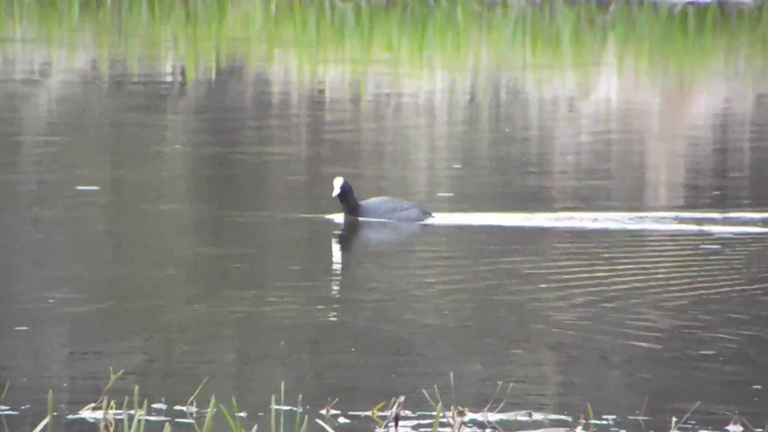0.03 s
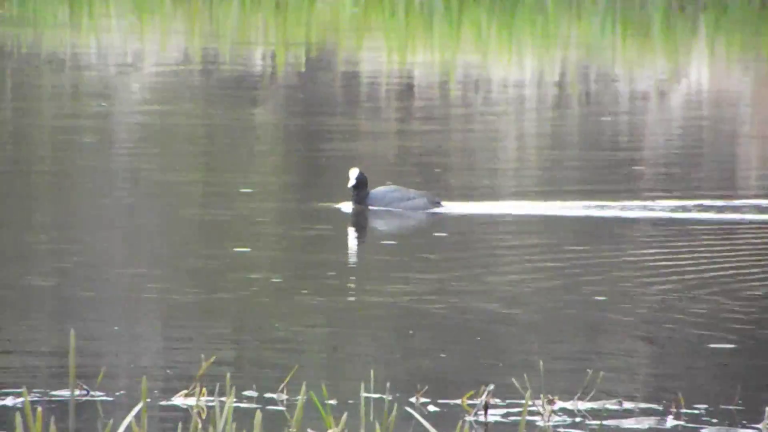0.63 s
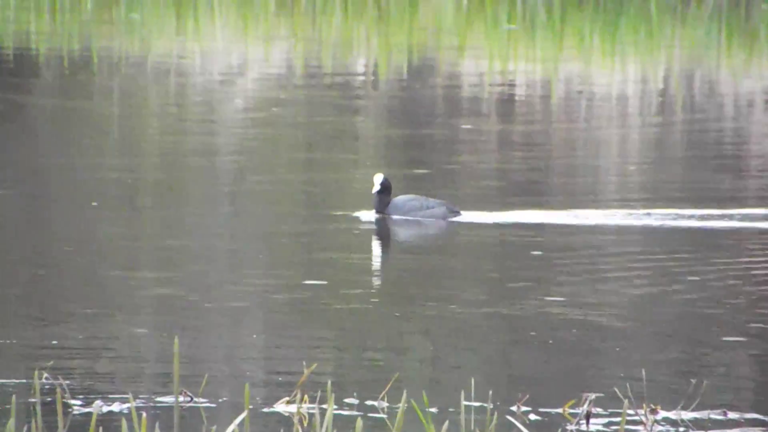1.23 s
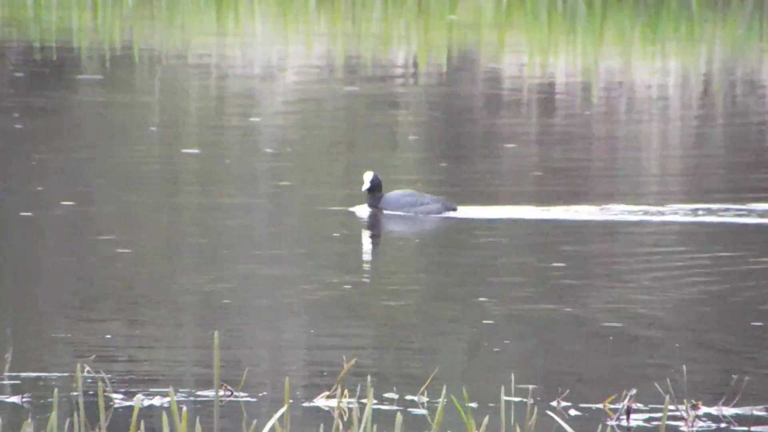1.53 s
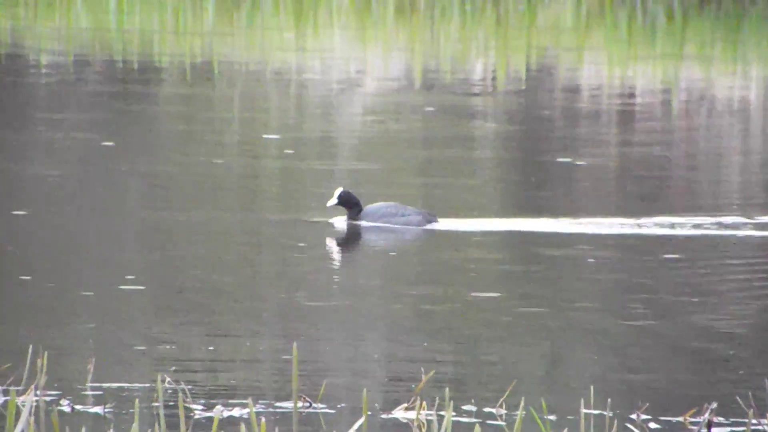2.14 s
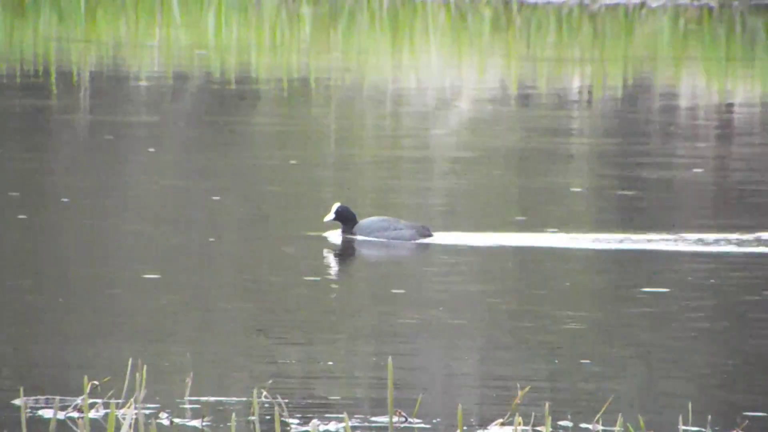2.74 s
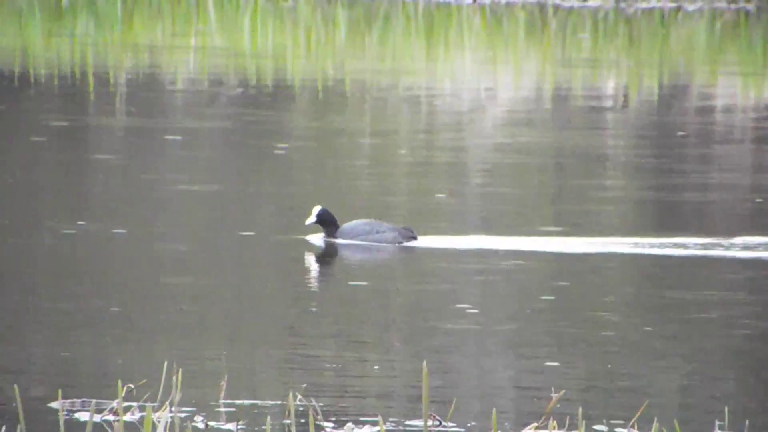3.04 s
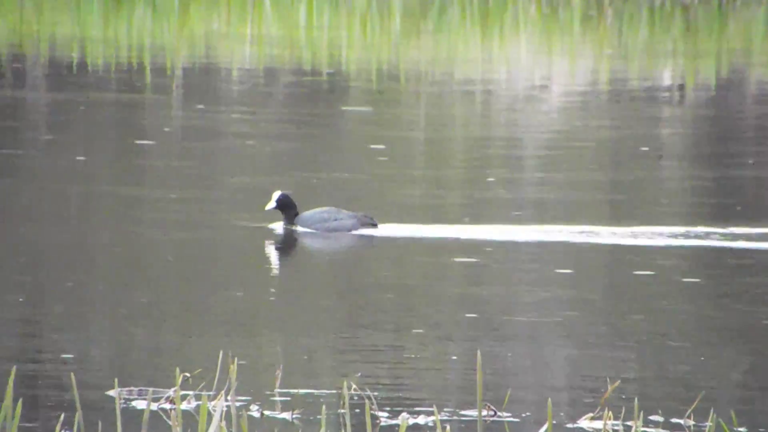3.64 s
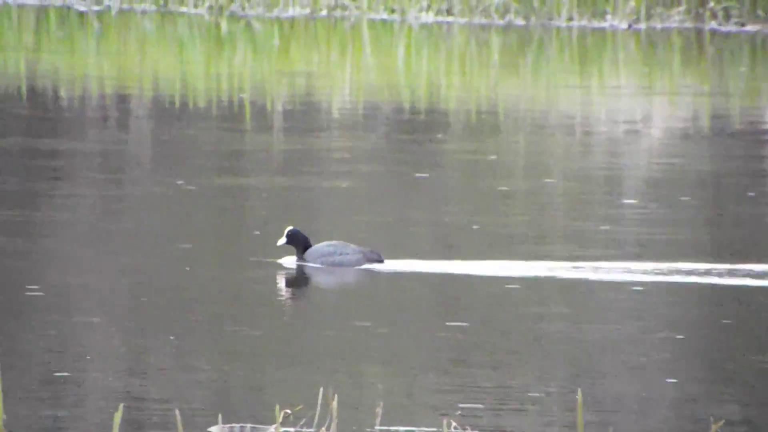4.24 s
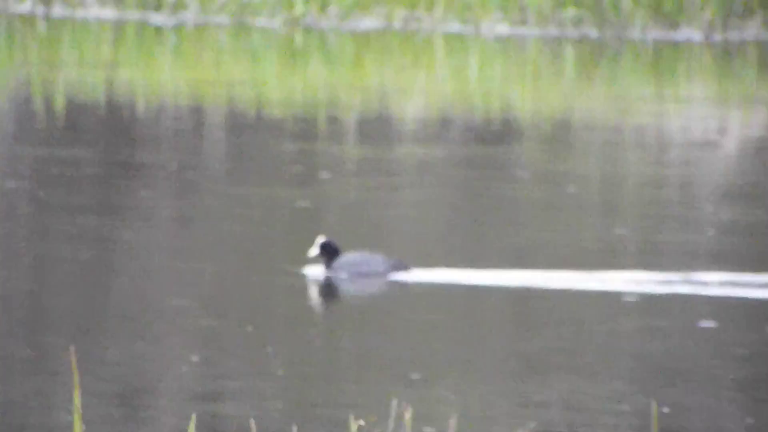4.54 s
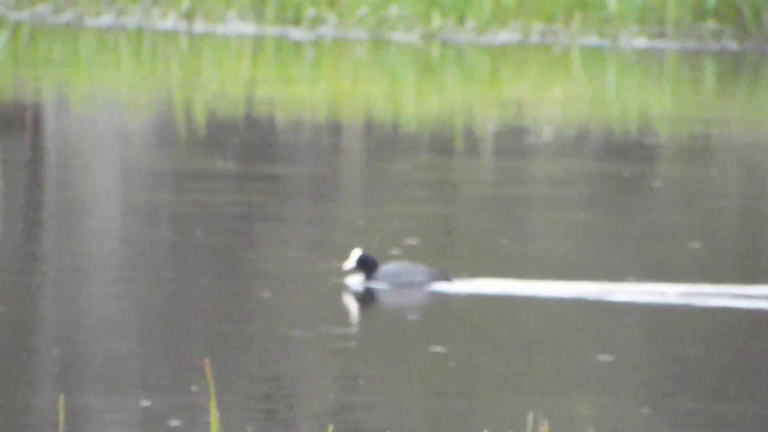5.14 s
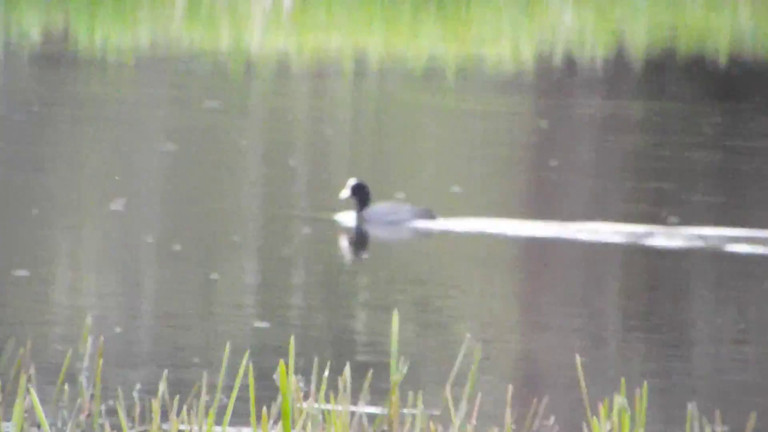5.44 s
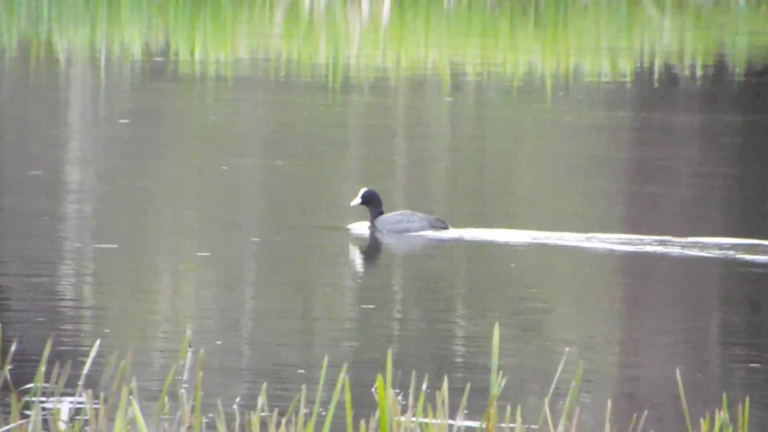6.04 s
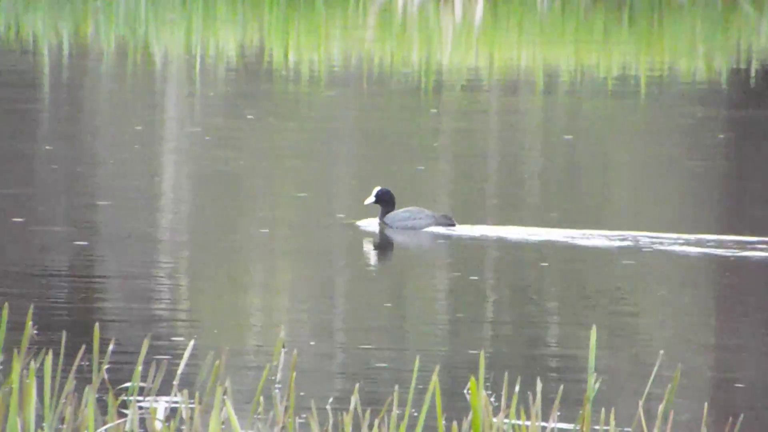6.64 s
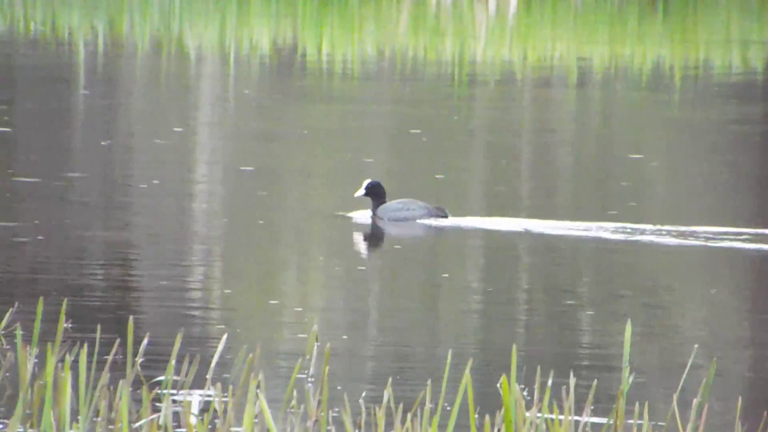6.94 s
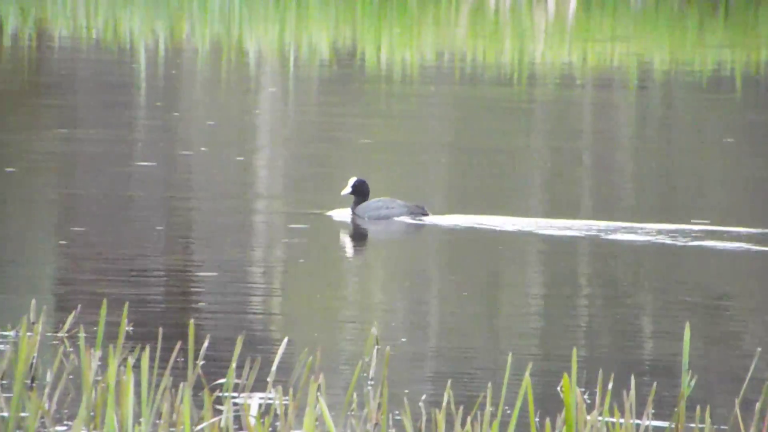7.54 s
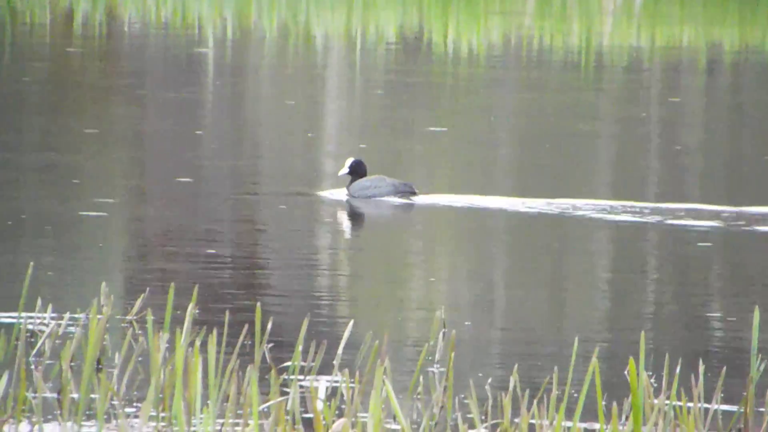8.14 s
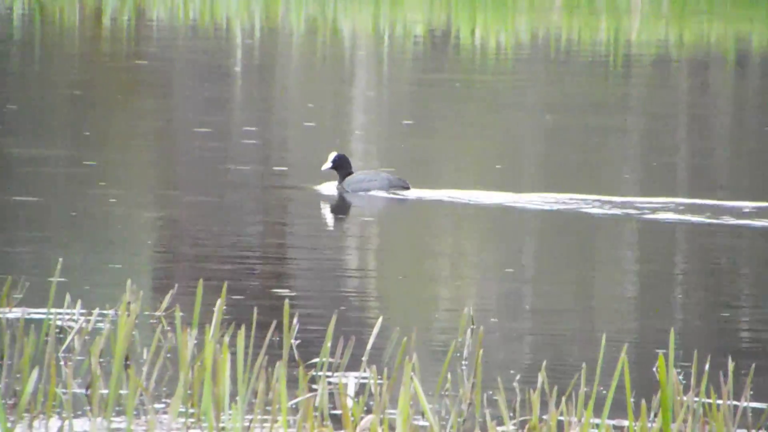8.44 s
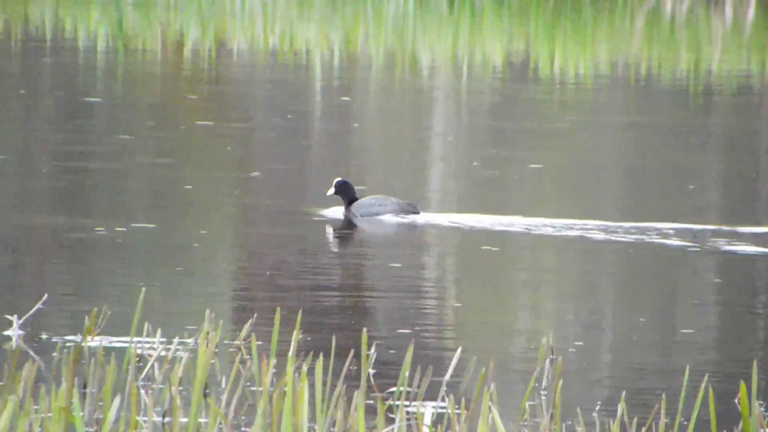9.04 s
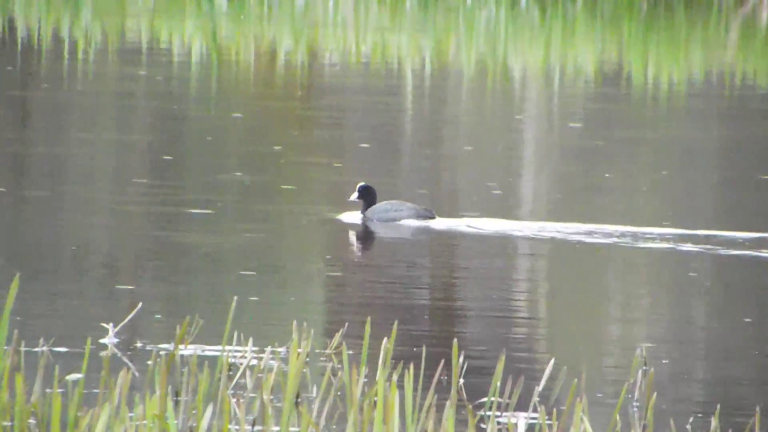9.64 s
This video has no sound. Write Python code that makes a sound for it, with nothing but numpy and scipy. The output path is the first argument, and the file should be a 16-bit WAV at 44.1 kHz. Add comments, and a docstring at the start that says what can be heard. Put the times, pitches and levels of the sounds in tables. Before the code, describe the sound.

A coot gives a steady series of short, sharp barking calls on a lake, with faint songbirds and light wind on the microphone.

```python
"""A lake. A brief thin buzz opens; air hiss, a camera's whir and light wind buffeting its two microphone
ports come in. From 0.26 to 4.7 s a coot calls nine times: a pulsed bark ending in two falling voices, one
per side of the syrinx. The reeds swell at 0.3 s; from 0.4 s small birds chirp far off in them. From 0.5 s
the focus motor rasps in short runs. The coot gives single-pulse 'pit' notes at 1.4 and 5.2 s. The camera
body clicks twice near 8 s; a last 'pit' follows at 9.3 s."""
import sys
import numpy as np
from scipy import signal
from scipy.fft import rfft, irfft
from scipy.io import wavfile
from scipy.ndimage import uniform_filter1d

SR = 44100
rng = np.random.default_rng(int(sys.argv[2]) if len(sys.argv) > 2 else 0)


def put_to_file(sound):
    """Save the sound as 16-bit audio at rate SR, in the file named by the first command-line argument."""
    columns = np.atleast_2d(sound).T  # one column per channel
    safe = np.clip(columns, -1, 1)
    whole_steps = np.round(safe * 32767)
    wavfile.write(sys.argv[1], SR, whole_steps.astype(np.int16))


N = 432180
TIME_S = np.arange(N) / SR
LEFT_RIGHT = np.array([[1], [-1]])
PUFF_HALF_SPAN_S = .03

# opening buzz spectrum: freq_hz, gain_db
BUZZ_SPECTRUM = [(100, -21), (280, -6), (700, -.5), (2500, -11), (14000, -27)]
# air and microphone hiss: freq_hz, gain_db
AIR_SPECTRUM = [(20, -21), (45, -8), (90, -14), (200, -26), (450, -13), (700, -8.5), (1200, -5.5),
                (1700, -12), (2500, -13.5), (5000, -19), (9000, -21.5), (15500, -22)]
# reed hiss envelope: time_s, level_db
REED_LEVELS = [(0, -72), (.3, -59.5), (.6, -58), (.9, -68), (1.3, -72.5), (3, -72), (9.8, -72.5)]
# reed hiss: freq_hz, gain_db
REED_SPECTRUM = [(300, 8), (1500, 1), (4000, 3.5), (7000, -4), (14000, -24)]
# camera body resonances: centre_hz, width_hz, gain_db
BODY_MODES = [(1047, 88, -6), (1224, 110, -2.5), (1457, 18, -6.5), (1692, 130, -13.5), (1989, 98, -8)]
# breeze at the ports, right one in the lee: time_s, left_db, right_db
GUSTS = [(0.1, -74, -80), (0.3, -49, -42), (0.42, -64, -58.5), (0.549, -50.5, -57.5), (1.499, -50, -59.5),
         (2.07, -61.5, -71), (2.601, -37, -41.5), (2.85, -56, -66), (3.05, -42, -54), (3.2, -56.5, -61),
         (3.6, -56, -64), (3.82, -45, -56.5), (4.18, -68, -66), (4.42, -46, -47.5), (4.75, -61, -64),
         (4.95, -47.5, -53), (5.1, -57.5, -60), (5.8, -54, -61), (5.95, -82, -83), (6.12, -85, -83),
         (6.25, -52, -61), (6.68, -64, -69.5), (6.88, -50, -63), (7.05, -76, -79), (7.22, -62.5, -73),
         (7.35, -49.5, -59.5), (8.05, -47.5, -55.5), (8.2, -51, -64), (8.9, -51, -57.5), (9.1, -57, -60),
         (9.45, -49, -53), (9.8, -52.5, -61)]
# slow eddies: freq_hz, gain_db
EDDY_SPECTRUM = [(15, -32), (30, -12), (70, 1), (190, 2), (340, -11), (480, -15), (700, -26.5), (1200, -67),
                 (2000, -90)]
# prominent puffs: middle_s, length_s, left_db, right_db, centre_hz
CLEAR_PUFFS = [(0.314, 0.019, -39.5, -47, 237), (0.666, 0.019, -58, -39.5, 259),
               (0.707, 0.013, -48, -36.5, 301), (0.862, 0.014, -37.5, -60, 268),
               (1.361, 0.016, -41.5, -49.5, 223), (1.501, 0.012, -35.5, -68, 310),
               (1.586, 0.011, -36, -70, 226), (1.887, 0.0094, -36, -51, 267),
               (1.987, 0.032, -43.5, -63, 210), (2.146, 0.0097, -44.5, -68, 220),
               (2.214, 0.016, -44.5, -60, 278), (2.426, 0.032, -41, -38, 333),
               (2.527, 0.015, -47, -40.5, 270), (2.562, 0.027, -35.5, -48, 312),
               (2.614, 0.037, -32.5, -57, 320), (2.759, 0.012, -37, -51, 205),
               (3.075, 0.028, -40.5, -64, 320), (3.778, 0.014, -38, -65, 221),
               (3.854, 0.014, -37.5, -65, 230), (4.067, 0.013, -39.5, -54, 218),
               (4.352, 0.013, -57, -40, 255), (4.419, 0.015, -42, -58, 248),
               (4.465, 0.027, -41.5, -45.5, 240), (4.984, 0.024, -36, -40, 262),
               (6.209, 0.031, -48, -65, 189), (6.321, 0.022, -47, -59, 280), (6.799, 0.013, -55, -59, 240),
               (7.787, 0.021, -40, -52, 247), (8.054, 0.028, -34.5, -66, 252),
               (8.112, 0.015, -38, -66, 272), (8.366, 0.014, -37.5, -59, 322),
               (8.442, 0.019, -42, -45, 242), (8.875, 0.012, -37, -45, 318), (9.482, 0.013, -39, -57, 370)]
# path from lake to ports: freq_hz, left_minus_right_db, left_lead_rad
PORT_RESPONSE = [(800, 3.5, 0), (1600, 3.5, -.1), (2698, 1.5, 0.5), (3584, 1, 0.17), (4480, 0.5, 0.2),
                 (5130, 12, 4.5), (6500, 15, -2.4), (8000, 9.5, 0), (14000, 1, -3.5)]
# coot calls: start_s, level_db, upper_tail_db, lower_db, lower_from_s, lower_until_s (both into the call),
# flick_ratio, roughness_ratio, stretch_ratio
COOT_CALLS = [(0.2596, -8.5, -1, 7, 0.018, 0.064, 0.017, 0.36, 0.87),
              (0.7152, -5.5, -2, 5, 0.022, 0.055, 0.009, 0.36, 0.934),
              (1.155, -7, -1, 7, 0.025, 0.053, 0.029, 0.39, 0.87),
              (1.7303, -6, -1.5, 6, 0.022, 0.051, 0.004, 0.31, 0.98),
              (2.2613, -5.5, -13, 6, 0.024, 0.062, 0, 0.25, 0.97),
              (2.8069, -6.5, -11.5, 7.5, 0.023, 0.064, 0.0021, 0.32, 1.06),
              (3.3385, -7, -0.5, 6, 0.024, 0.049, 0.098, 0.37, 0.94),
              (4.0161, -5, -6.5, 3, 0.026, 0.097, 0.0056, 0.33, 1.025),
              (4.606, -5, -5, 3, 0.025, 0.05, 0.048, 0.55, 1.01)]
# upper voice, unstretched: time_s, pitch_hz, level_db, overtones_db, bill_ring_db, pulse_depth_ratio
UPPER_CONTOUR = [(0, 905, -20.5, -5.5, 0, 1), (.005, 916, -35, 6, 7, 1), (.014, 914, -32, 3.5, 2.5, .95),
                 (.023, 911.7, -26, -3.5, -3, .9), (.031, 879, -31.5, -9, -3, 0.93),
                 (.045, 880, -38, -12, -8, .6), (.058, 860, -31.5, -27, -3, .1),
                 (.075, 843, -34, -31, -22, 0), (.088, 848, -49, -26, -3, 0)]
# upper voice harmonics, fundamental first: gain_db
UPPER_PARTIALS_DB = [-25, -10.5, 1.5, 2, -5, -17.5, -28.5, -20.5, -25, -36, -36]
# lower voice, unstretched: time_s, pitch_hz, level_db
LOWER_CONTOUR = [(.008, 850, -33), (.024, 825, -39.5), (.030, 815, -43.5), (.043, 790, -38.5),
                 (.053, 752, -46), (.063, 722, -45), (.075, 710, -85)]
# lower voice harmonics, fundamental first: gain_db
LOWER_PARTIALS_DB = [-21, 2, -17.5, -13, -24, -25]
# rising bird whistles: start_s, length_s, start_hz, end_hz, level_db
WHISTLE_NOTES = [(0.428, .09, 3380, 4060, -57), (1.857, 0.12, 3330, 4600, -63.5),
                 (2.62, 0.1, 3300, 3670, -74), (3.10, .12, 2760, 3330, -66),
                 (4.918, .095, 3450, 4340, -64.5), (6.844, 0.073, 3480, 4580, -61.5),
                 (9.601, 0.15, 2355, 2560, -64)]
# arched bird notes: start_s, length_s, top_hz, level_db, upstroke_db
ARCH_NOTES = [(0.947, 0.13, 6600, -48, -15), (1.36, .15, 6620, -45, -14), (2.711, 0.1, 6350, -55, -9),
              (4.543, 0.05, 5600, -52.5, -5), (6.265, 0.15, 6360, -49, -2)]
# shape of one arch: length_ratio, pitch_ratio, level_db
ARCH_CONTOUR = [(0, .45, -4), (.07, 0.59, 4), (.13, 0.91, -1), (.3, 1, -25), (.55, 0.97, -16),
                (.82, 0.86, -8), (.89, .88, 0.5), (.94, 0.9, 1), (1, 0.68, 2)]
# focus motor runs: start_s, length_s, level_db
FOCUS_RUNS = [(0.541, 0.054, -56.5), (0.614, 0.025, -55.5), (0.659, 0.034, -59), (3.014, 0.099, -57.5),
              (3.128, 0.028, -57.5), (3.196, 0.031, -56), (5.145, 0.028, -56.5), (5.179, 0.027, -57),
              (5.208, 0.092, -57.5), (5.325, 0.03, -56.5), (5.703, 0.014, -57), (5.722, 0.081, -59),
              (5.816, 0.028, -57), (5.878, 0.032, -56), (9.745, 0.048, -57)]
# lens drive rasp: freq_hz, gain_db
FOCUS_SPECTRUM = [(200, -7), (450, 9), (900, 8.5), (1400, 8.5), (1950, 10), (2300, -11), (3400, -4.5),
                  (5000, -25), (9000, -37)]
# coot 'pit' notes: start_s, level_db
PIT_NOTES = [(1.4150, -38.5), (5.2463, -42), (9.2688, -41)]
# 'pit' timbre: freq_hz, gain_db
PIT_SPECTRUM = [(500, -3), (1150, -0.5), (2200, -6), (3300, -8), (4300, 3.5), (5500, -6), (6600, -19),
                (10000, -22), (15000, -38)]
# bird trills: start_s, length_s, centre_hz, rise_hz, level_db
TRILL_NOTES = [(5.18, 0.13, 3480, 50, -54), (6.969, .15, 3440, 200, -55), (8.04, .22, 3460, 223, -53),
               (9.052, 0.153, 3460, 60, -54.5)]
# camera body clicks: start_s, level_db
BODY_CLICKS = [(7.9776, -26.5), (7.988, -39)]


def undb(db):
    """Decibels to gain."""
    return 10 ** (np.asarray(db) / 20)


def unit(x):
    """Scale to rms 1."""
    return x / np.sqrt(np.mean(x ** 2))


def curves(table, at):
    """Interpolate each column over the first."""
    axis, *columns = np.transpose(table)
    return [np.interp(at, axis, column) for column in columns]


def colour(x, spectrum):
    """Filter by a (freq_hz, gain_db) outline."""
    hz, db = np.transpose(spectrum)
    bins_hz = np.maximum(np.fft.rfftfreq(x.shape[-1], 1 / SR), 1)
    return irfft(rfft(x) * undb(np.interp(np.log(bins_hz), np.log(hz), db)), x.shape[-1])


def wander(t, rate_hz):
    """Random drift, spread near 1."""
    points = rng.standard_normal(int(t[-1] * rate_hz) + 2)
    return np.interp(t * rate_hz, np.arange(len(points)), points)


def clock(length_s):
    """Time axis of one event."""
    return np.arange(int(length_s * SR)) / SR


def add(track, start_s, sound):
    """Mix a sound into a track."""
    i = max(int(start_s * SR), 0)
    track[i:i + len(sound)] += sound[:max(N - i, 0)]


def phase_rad(hz):
    """Phase of a moving pitch."""
    return 2 * np.pi * np.cumsum(hz) / SR


def pan(x, left_db):
    """Stereo, left_db louder on the left."""
    return x * undb(LEFT_RIGHT * left_db / 2)


def ports(x):
    """Sound bends round the camera: own level and phase at each port."""
    left_db, lead_rad = curves(PORT_RESPONSE, np.fft.rfftfreq(N, 1 / SR))
    return irfft(pan(rfft(x), left_db) * np.exp(.5j * lead_rad * LEFT_RIGHT), N)


def shore(x, wet_db, t60_s):
    """Diffuse echo from reeds and trees, separate per channel."""
    t = clock(.71)
    tail = rng.standard_normal((2, len(t))) * undb(-60 * t / t60_s) * np.minimum(t / .002, 1)
    tail /= np.sqrt(np.sum(tail ** 2, axis=1, keepdims=True))
    return undb(wet_db) * signal.fftconvolve(x[None], tail, axes=1)[:, :N]


def opening_buzz(pitch_hz=275.6, gain_db=-14.5):
    """Thin buzz: a 0.1 s impulse train."""
    pulses = np.zeros(N)
    pulses[(np.arange(.035, .137, 1 / pitch_hz) * SR).astype(int)] = 1
    return undb(gain_db) * colour(pulses, BUZZ_SPECTRUM)


def camera_whir(noise, level_db=-62):
    """Noise rings the body resonances; the level flutters."""
    bins_hz = np.fft.rfftfreq(N, 1 / SR)
    body = sum(undb(db) / (1 + (2 * (bins_hz - hz) / width_hz) ** 2) for hz, width_hz, db in BODY_MODES)
    whir = unit(irfft(rfft(noise) * body, N))
    return pan(whir * undb(level_db + 1.9 * wander(TIME_S, 25)), left_db=11.1)


def background(air_db=-61):
    """Steady air hiss, one swell of reeds and the whir, each from mid and side noise."""
    air_mid, reed_mid, side, whir_mid, whir_side = rng.standard_normal((5, N))
    air = unit(colour(air_mid + .67 * side * LEFT_RIGHT, AIR_SPECTRUM))
    air *= undb(air_db + .74 * wander(TIME_S, 2.88))
    reeds = unit(colour(reed_mid + .3 * side * LEFT_RIGHT, REED_SPECTRUM))
    reeds *= undb(curves(REED_LEVELS, TIME_S)[0])
    return pan(air, left_db=.14) + reeds + camera_whir(whir_mid + .75 * whir_side * LEFT_RIGHT)


def wind(eddy_hz=90, eddy_db=6, buffet_hz=16, buffet_db=4, trim_db=-2, fast_ratio=1.62, strong_db=-38):
    """Eddies buffet each port; stronger gusts sweep them past faster, so they sound higher."""
    out = np.zeros((2, N))
    fast_spectrum = [(hz * fast_ratio, db) for hz, db in EDDY_SPECTRUM]
    for port, gust_db in zip(out, curves(GUSTS, TIME_S)):
        pressure = rng.standard_normal(N)
        pressure *= undb(eddy_db * wander(TIME_S, eddy_hz) + buffet_db * wander(TIME_S, buffet_hz))
        speed = np.clip(undb(gust_db - strong_db), 0, 1)
        eddies = (1 - speed) * colour(pressure, EDDY_SPECTRUM) + speed * colour(pressure, fast_spectrum)
        running_rms = np.sqrt(uniform_filter1d(eddies ** 2, size=SR // 6))
        port += eddies / running_rms * undb(gust_db + trim_db)
    return out


def thump(hz, length_s):
    """One eddy passes a port: a pressure swirl, strongest at hz, steep cut above."""
    t = clock(2 * PUFF_HALF_SPAN_S) - PUFF_HALF_SPAN_S
    swirl = rng.standard_normal(len(t)) * np.exp(-(2.75 * t / length_s) ** 2)
    swirl = colour(swirl, [(hz / 10, -23), (hz / 3, -8), (hz, 0), (hz * 1.68, -9), (hz * 4, -50)])
    return swirl * np.sqrt(length_s * SR / np.sum(swirl ** 2))


def puffs(clear_trim_db=-1.5, rate_hz=6, over_gust_db=4, scatter_db=5, centre_hz=255, scatter_oct=.2):
    """Single eddies hit the ports: clear ones, plus random lesser ones that grow with the breeze."""
    out = np.zeros((2, N))
    for middle_s, length_s, left_db, right_db, hz in CLEAR_PUFFS:
        for port, db in zip(out, (left_db, right_db)):
            add(port, middle_s - PUFF_HALF_SPAN_S, undb(db + clear_trim_db) * thump(hz, length_s))
    for side, port in enumerate(out):
        for slot, offset in enumerate(rng.random(size=100)):
            force, height = rng.standard_normal(size=2)
            middle_s = (slot + offset) / rate_hz
            db = curves(GUSTS, middle_s)[side] + over_gust_db + scatter_db * force
            hz = centre_hz * 2 ** (scatter_oct * height)
            add(port, middle_s - PUFF_HALF_SPAN_S, undb(db) * thump(hz, length_s=.011))
    return out


def upper_voice(t, stretch, tail_db, flick, roughness, pulse_hz=110, bill_hz=3700, bill_width_hz=480):
    """One side of the syrinx: three bright pulses, then a soft, nearly pure falling note."""
    hz, db, bright_db, ring_db, depth = curves(UPPER_CONTOUR, t / stretch)
    pulse = np.sin(np.pi * (pulse_hz * t % 1))
    gate = 1 - depth * (1 - np.abs(pulse) ** 1.25)
    scoop = .022 * depth * (pulse - .7)
    hz = hz * (1 + flick * np.exp(-((t - .014) / .00622) ** 2) + scoop)
    # membrane turns unsteady in the second pulse
    unrest = roughness * np.interp(t, [.004, .011, .02, .04], [.42, .8, .9, .66])
    phase = phase_rad(hz * (1 + .15 * unrest * wander(t, 1773)))
    overtones = 0
    # each closure snaps; the bill's resonance shapes the nearest overtone
    for k, partial_db in enumerate(UPPER_PARTIALS_DB[1:], 2):
        bill_db = ring_db * np.exp(-((k * hz - bill_hz) / bill_width_hz) ** 2)
        overtones += undb(partial_db + bill_db) * np.cos(k * phase - .15 * k * k)
    bark_hz = UPPER_CONTOUR[1][1]
    throat = [(bark_hz * k, partial_db) for k, partial_db in enumerate(UPPER_PARTIALS_DB, 1)]
    rasp = unit(colour(rng.standard_normal(len(t)), throat))
    rasp *= undb(-3) * (unrest + .17) * np.minimum(t / .0015, 1)
    soft = np.sin(phase) + undb(-11) * np.sin(2 * phase) * (1 - depth)
    in_tail = np.clip((t - .026) / .0027, 0, 1)
    return undb(db + tail_db * in_tail) * (gate * soft + undb(bright_db) * (gate * overtones + rasp))


def lower_voice(t, stretch):
    """Other side of the syrinx: a lower falling note, heard mostly by its octave."""
    hz, db = curves(LOWER_CONTOUR, t / stretch)
    phase = phase_rad(hz * (1 + .03 * wander(t, 910)))
    tone = sum(undb(partial_db) * np.sin(k * phase) for k, partial_db in enumerate(LOWER_PARTIALS_DB, 1))
    tremor_db = 2 * wander(t, 400)
    return undb(db + tremor_db) * tone


def coot_calls():
    """Both voices sound together; open water gives little echo."""
    out = np.zeros(N)
    for start_s, db, tail_db, lower_db, from_s, until_s, flick, roughness, stretch in COOT_CALLS:
        t = clock(.099 * stretch)
        upper = upper_voice(t, stretch, tail_db, flick, roughness)
        lower_gate = np.clip(np.minimum(t - from_s, until_s - t) / .0041 + .5, .12, 1)
        lower = undb(lower_db) * lower_gate * lower_voice(t, stretch)
        release = np.minimum((t[-1] - t) / .004, 1)
        add(out, start_s, undb(db) * (upper + lower) * release)
    near_reeds = shore(out, wet_db=-18, t60_s=.066)
    return ports(out) + near_reeds + shore(out, wet_db=-28.5, t60_s=1.0)


def songbirds(warble_ratio=.024, trill_hz=43):
    """Rising whistles, warbling arches and trills of down-slides, blurred by the reeds."""
    near, far = np.zeros((2, N))
    for start_s, length_s, start_hz, end_hz, db in WHISTLE_NOTES:
        t = clock(length_s)
        progress = t / length_s
        hz = start_hz + (end_hz - start_hz) * progress ** 1.7
        swell = undb(db + 1.3 * wander(t, 78.3)) * np.sin(np.pi * progress)
        add(near, start_s, swell * np.sin(phase_rad(hz)))
    for start_s, length_s, top_hz, db, upstroke_db in ARCH_NOTES:
        t = clock(length_s)
        pitch_ratio, shape_db = curves(ARCH_CONTOUR, t / length_s)
        shape_db += upstroke_db * np.clip(1 - (t / length_s / .26) ** 4, 0, 1)
        hz = top_hz * pitch_ratio * (1 + warble_ratio * wander(t, 1233))
        add(far, start_s, undb(db + shape_db) * np.sin(phase_rad(hz)))
    for start_s, length_s, centre_hz, rise_hz, db in TRILL_NOTES:
        t = clock(length_s)
        note_progress = (trill_hz * t + .15 * wander(t, 30)) % 1
        swell = np.sqrt(np.sin(np.pi * note_progress) * np.sin(np.pi * t / length_s))
        slide = .1 * (1 - 2 * note_progress) + .02 * wander(t, 45) + .025 * wander(t, 600)
        hz = centre_hz * (1 + slide) + rise_hz * (t / length_s - .5)
        add(far, start_s, undb(db) * swell * np.sin(phase_rad(hz)))
    direct = ports(1.17 * near + .43 * far)
    return direct + shore(near, wet_db=-2.5, t60_s=.15) + shore(far, wet_db=-7.5, t60_s=.049)


def focus_motor(step_hz=330, grit_db=3.5, trim_db=7):
    """The lens moves in uneven, scraping steps that reach each port by its own path."""
    out = np.zeros((2, N))
    for start_s, length_s, db in FOCUS_RUNS:
        t = clock(length_s)
        steps = undb(grit_db * wander(t, step_hz) + 2 * wander(t, 74))
        for port in out:
            scrape = unit(colour(steps * rng.standard_normal(len(t)), FOCUS_SPECTRUM))
            add(port, start_s, undb(db + trim_db) * scrape * signal.windows.tukey(len(t), .15))
    return pan(out, left_db=7)


def coot_pits(pitch_hz=1150, fall_ratio=.08, length_s=.0063, trim_db=5):
    """Each note is one harsh pulse of voice, sliding down."""
    out = np.zeros(N)
    t = clock(.04)
    swell = np.minimum(t / .0045, 1) / (1 + (t / length_s) ** 4)
    for start_s, db in PIT_NOTES:
        jitter = .05 * wander(t, 1500)
        phase = phase_rad(pitch_hz * (1 + fall_ratio * np.exp(-t / .0015) + jitter))
        buzz = sum(np.cos(k * phase) for k in range(1, 10)) + 2 * rng.standard_normal(len(t))
        add(out, start_s, undb(db + trim_db) * swell * unit(colour(buzz, PIT_SPECTRUM)))
    return ports(out) + shore(out, wet_db=-10, t60_s=.09)


def body_clicks(rise_s=.00004, fall_s=.0004, trim_db=5.5):
    """A sharp push on the camera body, with a small rebound."""
    out = np.zeros(N)
    t = clock(.004)
    push = (1 - np.exp(-t / rise_s)) * np.exp(-t / fall_s) * (1 - t / (2 * fall_s))
    for start_s, db in BODY_CLICKS:
        add(out, start_s, undb(db + trim_db) * push)
    return pan(out, left_db=11.3)


def scene():
    """Lake and camera sounds; the surroundings enter during the buzz."""
    surroundings = (wind() + puffs() + background()) * np.clip((TIME_S - .07) / .039, 0, 1)
    birds = coot_calls() + coot_pits() + songbirds()
    return opening_buzz() + surroundings + birds + focus_motor() + body_clicks()


def record(dry, cutoff_hz=15800):
    """Fade-in and steep low-pass."""
    fade = np.clip((TIME_S - .03) / .09, 0, 1) ** 2
    return signal.sosfilt(signal.ellip(10, .2, 60, cutoff_hz, fs=SR, output="sos"), dry * fade)


dry = scene()
out = record(dry)
put_to_file(out)
```